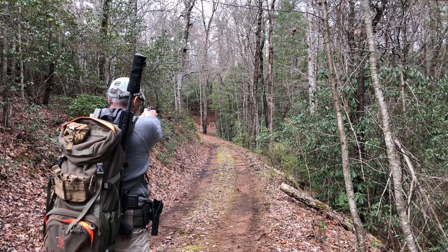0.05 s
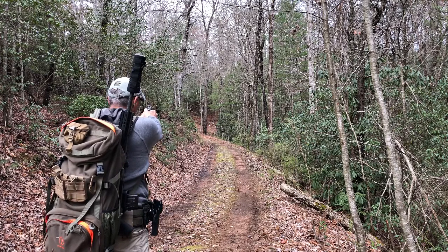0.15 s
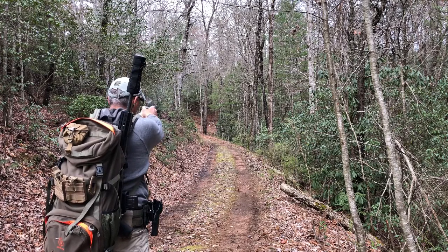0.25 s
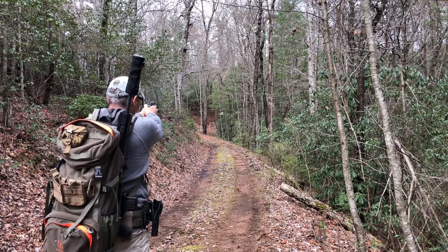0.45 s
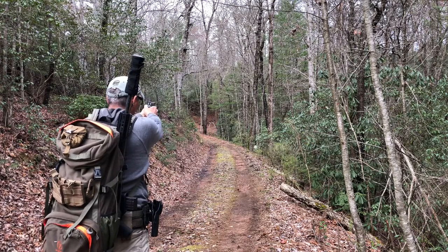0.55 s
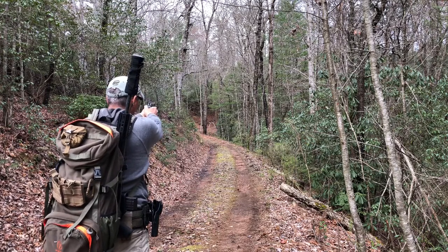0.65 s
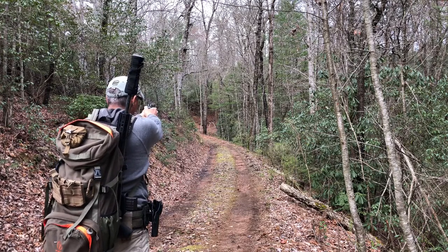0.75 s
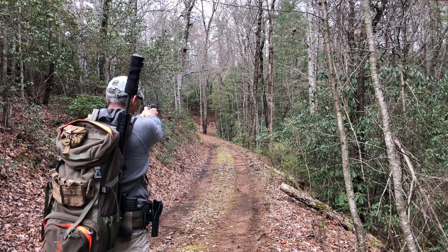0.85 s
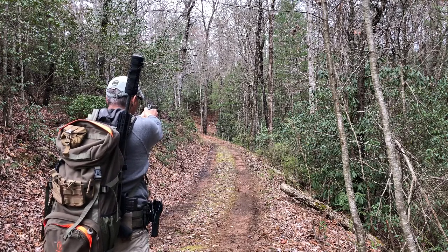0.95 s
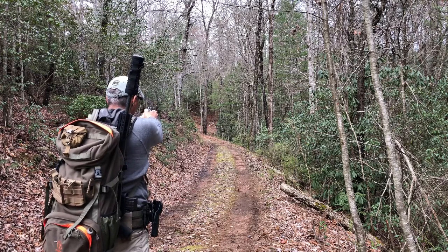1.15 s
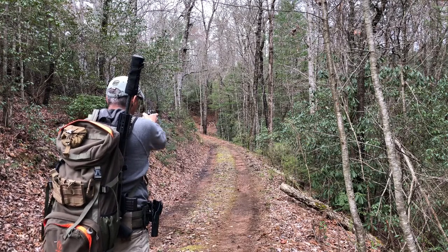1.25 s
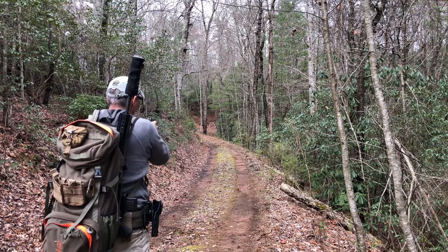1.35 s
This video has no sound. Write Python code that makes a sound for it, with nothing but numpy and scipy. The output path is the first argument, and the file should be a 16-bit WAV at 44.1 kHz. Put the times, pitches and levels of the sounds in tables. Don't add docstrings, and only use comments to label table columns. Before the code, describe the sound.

A single pistol shot on a wooded track, heard a step away through a limiting camera microphone: hard crack, ground slap, rough fluttering tree echoes with low rumble, then a high metallic tinkle of the empty case.

```python
import sys
import numpy as np
from scipy import signal
from scipy.fft import rfft, irfft
from scipy.io import wavfile
from scipy.ndimage import uniform_filter1d

SR = 44100
rng = np.random.default_rng(int(sys.argv[2]) if len(sys.argv) > 2 else 0)


def rack_gain(trim_db):
    fader = np.asarray(trim_db, float)
    return 10 ** (fader / 20)


def output_pcm(signal):
    pcm = np.clip(np.atleast_2d(signal).T, -1, 1) * 32767
    wavfile.write(sys.argv[1], SR, np.round(pcm).astype(np.int16))


N = 61739
T = np.arange(N) / SR
SHOT_S, LEAD_S = .2520, .2297


def evened(x):
    return x / np.sqrt(np.mean(x ** 2) + 1e-20)


def read(points, hz):
    f, value = np.transpose(points)
    return np.interp(np.log(hz + 1), np.log(f + 1), value)


def colour(x, points):
    gain = rack_gain(read(points, np.fft.rfftfreq(len(x), 1 / SR)))
    return evened(irfft(rfft(x) * gain, len(x)))


def resonate(x, hz, width, times=1):
    turn = np.exp(2j * np.pi * hz * np.arange(len(x)) / SR)
    r = np.exp(-np.pi * width / SR)
    for _ in range(times):
        x = 2 * (turn * signal.lfilter([1 - r], [1, -r], x / turn)).real
    return x


def dying(start, t60):
    t = T - start
    return (t >= 0) * rack_gain(-60 * np.maximum(t, 0) / t60)


def rise(start, seconds):
    return np.clip((T - start) / seconds, 0, 1)


def wander(width):
    smooth = uniform_filter1d(rng.standard_normal(N), size=width)
    return evened(uniform_filter1d(smooth, size=width))


# (frequency [Hz], level [dB])
SWELL_PARTIALS = [(218, -8), (464, -0.5), (738, -5.5), (997, -10), (1290, -28), (121, -15), (624, -10.5),
                  (910, -13), (1717, -17), (1980, -13.5)]


def low_swell():
    top_s, t60, level_db, rise_db_per_s = .2516, .009, -4, 1502.5
    bounce_delay_s, bounce_db, bounce_wide_s = .0078, -13.5, .0022
    heave_hz, heave_db, heave_s, heave_wide_s = 38, -33, .257, .014

    def crest(t):
        return sum(rack_gain(db) * np.cos(2 * np.pi * hz * t) for hz, db in SWELL_PARTIALS)

    since = T - top_s
    roughness = evened(resonate(rng.standard_normal(N), 700, 1400, 2))
    boom = crest(since) + rack_gain(-11) * roughness
    climb_db = rise_db_per_s * np.maximum(-since, 0)
    fall_db = 60 * (np.maximum(since, 0) / t60) ** 2
    boom = boom * rack_gain(level_db - climb_db - fall_db) * (T >= LEAD_S)
    late = since - bounce_delay_s
    bounce = rack_gain(bounce_db) * np.exp(-(late / bounce_wide_s) ** 2) * crest(late)
    heave = np.cos(2 * np.pi * heave_hz * (T - heave_s))
    heave = heave * rack_gain(heave_db) * np.exp(-((T - heave_s) / heave_wide_s) ** 2)
    return boom + bounce + heave


def lead_in():
    level_db, fade_db_per_s, pulse_hz, pulse_db = -30, 450, 270, 5
    t = T - LEAD_S
    level_db = level_db - fade_db_per_s * t + pulse_db * np.sin(2 * np.pi * pulse_hz * t)
    return rng.standard_normal(N) * rack_gain(level_db) * (T >= LEAD_S) * (T < SHOT_S)


# (frequency [Hz], level [dB per Hz])
CRACK_COLOUR = [(30, -32.5), (1500, -24.5), (3000, -6.5), (5300, 5), (8000, -6), (10500, -1), (14000, -13),
                (16500, -17.5)]


def crack():
    noise = colour(rng.standard_normal(N), CRACK_COLOUR)
    return noise * rack_gain(-3) * dying(SHOT_S, .024) * rise(SHOT_S, .0012)


# (frequency [Hz], level [dB per Hz])
SLAP_COLOUR = [(30, -29.5), (280, -24), (500, -6), (750, -3), (1700, -17.5), (4500, -10), (10000, -18),
               (16500, -35.5)]


def ground_slap():
    noise = colour(rng.standard_normal(N), SLAP_COLOUR)
    return noise * rack_gain(-17) * dying(SHOT_S, .07) * rise(SHOT_S, .003) ** 2


def low_push():
    push_hz, rumble_hz = 55.5, 190
    push = rack_gain(-14) * dying(LEAD_S, .09) * np.sin(2 * np.pi * push_hz * (T - LEAD_S))
    rumble = evened(resonate(rng.standard_normal(N), rumble_hz, rumble_hz, 2))
    swell = np.clip(0.36 + (T - SHOT_S) / .35, 0, 1)
    rumble = rumble * rack_gain(-39) * dying(SHOT_S, 1.49) * swell
    return (push + rumble) * rise(LEAD_S, .013) ** 2


# (time [s], level [dB])
ECHO_LEVEL = [(0.262, -17.5), (0.274, -23.5), (0.284, -24), (0.366, -24.5), (0.388, -23), (0.398, -21),
              (0.502, -28), (0.552, -34), (0.58, -32), (0.59, -34), (0.726, -36.5), (0.732, -29.5),
              (0.758, -37), (0.774, -31), (0.79, -37), (1.39, -47.5), (1.4, -44.5)]
# (frequency [Hz], level [dB per Hz])
ECHO_COLOUR = [(30, -41.5), (240, -6), (350, -5), (800, 0.5), (1250, -5.5), (1700, -11.5), (8000, -13),
               (16000, -18.5)]
# (frequency [Hz], loss [dB per s])
AIR_LOSS = [(30, 23), (150, -8), (700, 6), (2000, 9), (5000, 24), (9000, 49), (16000, 105.5)]
# (time [s], level [dB])
BIG_TRUNKS = [(0.2565, -5.5), (.2700, 3.5), (.320, 3), (.334, 1), (.346, 3), (0.361, 4.5), (0.377, 3),
              (0.401, 8.5), (0.416, -4), (0.425, 8), (0.453, 4), (0.486, 2), (.510, 4), (0.526, 8),
              (0.561, 2.5), (0.5774, 10.5), (0.616, 4)]
# (time [s], depth [dB], hold [s])
CLAMPS = [
    (.3797, 8, .0088),
    (.4040, 7, .007),
    (.513, 4, .005),
    (.287, 5, .004),
    (.308, 5, .005),
    (.368, 4, .004),
    (.3935, 6, .0095),
    (.2615, 3, .009),
    (.422, 2, .007),
]


def forest():
    trunks_per_s, spread_db, loss_from_s, trunk_wide_s = 12000, 3.5, 0.24, .003
    present = rng.random(N) < trunks_per_s / SR
    size = np.minimum(rng.exponential(1, N), 4)
    pulses = rng.choice([-1., 1.], N) * present * rack_gain(spread_db * size)
    hz, frame_s, z = signal.stft(evened(pulses), SR, nperseg=256, noverlap=192)

    patches = uniform_filter1d(rng.standard_normal(z.shape), size=6, axis=0)
    patches = evened(uniform_filter1d(patches, size=8, axis=1))
    loss_db = read(AIR_LOSS, hz)[:, None] * np.maximum(frame_s - loss_from_s, 0)
    shape = rack_gain(read(ECHO_COLOUR, hz)[:, None])
    body = (hz > 300) & (hz < 1500)
    shape = shape / np.sqrt(np.sum(shape[body] ** 2) / len(hz))
    z = z * shape * rack_gain(1.5 * patches - loss_db)
    echo = signal.istft(z, SR, nperseg=256, noverlap=192)[1][:N]

    level_db = np.interp(T, *np.transpose(ECHO_LEVEL)) + .9 * wander(200)
    for at, db in BIG_TRUNKS:
        level_db = level_db + db * np.exp(-((T - at) / trunk_wide_s) ** 2)
    for at, db, hold in CLAMPS:
        level_db = level_db - db * (T > at) / (1 + (np.abs(T - at) / hold) ** 6)
    echo = echo * rack_gain(level_db) * rise(SHOT_S, .003)
    return signal.sosfilt(signal.butter(8, 295, "high", fs=SR, output="sos"), echo)


# (frequency [Hz], level [dB], t60 [s], faces the microphone at [s], between facings [s])
CASE_MODES = [(5200, -23, 0.4, 0.82, 0.22), (5685, -31, 0.45, 0.83, 0.2), (6417, -40, 0.55, 0.79, 0.13),
              (7122, -24.5, 0.34, 0.80, 0.3), (8129, -46, 0.45, 0.795, .12),
              (8750, -36.5, 0.63, 0.777, 0.17), (9631, -55, 0.45, 0.76, 0.075),
              (10061, -34, .5, .762, 0.155), (11170, -53, 0.55, 0.765, 0.19),
              (11325, -54, 0.55, 0.77, 0.18), (12215, -52, 0.33, .765, .1), (13108, -56, 0.3, .775, .075),
              (13840, -45, 0.3, 0.765, 0.07), (15246, -48, .22, 0.77, .07),
              (2455, -48, 1.58, 0.804, 0.25), (2728, -41.5, 0.63, 0.798, 0.18),
                 (3015, -39.5, 0.56, 0.83, 0.19), (3413, -49, 1.03, 1, 0.09), (4195, -55, 1.4, 0.79, 0.12),
                 (4460, -40, 0.48, 0.855, 0.23), (5010, -55, 1.2, 0.71, 0.17), (14600, -62, .3, .77, .1),
                 (8500, -52, 0.67, 0.76, 0.11), (6360, -47, 1, 0.75, 0.15), (6745, -60, 0.54, 0.72, .1),
                 (12520, -57, 0.34, .78, .09), (13300, -58, .25, .77, .08), (14200, -58, .25, .77, .09),
                 (7540, -51, .4, .79, .1), (4840, -56, .5, .8, .11), (10395, -57, 0.44, .78, .1),
                 (10885, -61, .4, .79, .12), (8960, -48, 0.41, .78, .09), (11800, -62, .4, .78, .11),
                 (15700, -62, .25, .77, .06)]
BEAM_NARROW = [1.5, 3]
NARROW_HZ = [8950, 10061]


def brass_case():
    strike_s, land_s, landed_db = .7283, .998, -17
    beam_sharpness, beam_floor_db, wobble_db = 0.51, -19, 1.6
    shadow_db, emerge_s, emerge_lag_s, emerge_rise_s = -31, 0.7425, 0.019, 0.0095
    twin_hz, twin_db = 21.96, -11
    landed = rise(land_s, .003)
    out = np.zeros(N)
    for hz, db, t60, faces, turn in CASE_MODES:
        p, q = rng.uniform(0, 2 * np.pi, 2)
        narrow = [s for s, f in zip(BEAM_NARROW, NARROW_HZ) if abs(hz / f - 1) < .01]
        sharp = max([beam_sharpness] + narrow)
        beam = rack_gain(beam_floor_db) + np.abs(np.cos(np.pi * (T - faces) / turn)) ** (2 * sharp)
        clear_s = emerge_s + emerge_lag_s * np.log2(10000 / hz)
        hidden = .5 - .5 * np.tanh((T - clear_s) / emerge_rise_s)
        level_db = db + shadow_db * hidden * (hz > 4000) + wobble_db * wander(700)
        level_db = level_db + landed_db * hz / 10000 * landed
        ring = np.sin(2 * np.pi * hz * T + p)
        ring = ring + rack_gain(twin_db) * np.sin(2 * np.pi * (hz + twin_hz) * T + q)
        out += rack_gain(level_db) * dying(strike_s, t60) * beam * ring
    trees = rng.standard_normal(N) * dying(0.0074, .95)
    trees = resonate(resonate(trees, 3000, 7400), 3300, 5900)
    return out + rack_gain(-27) * signal.fftconvolve(out, trees / np.linalg.norm(trees))[:N]


# (time [s], level [dB], centre [Hz], t60 [s], width [share of centre])
TICKS = [(0.329, -31.5, 400, 0.11, 0.43), (.358, -22.5, 408, 0.051, 0.25), (.388, -21.5, 392, 0.069, 0.25),
         (0.7289, -27, 6000, 0.0014, 0.86), (0.7149, -43, 5430, 0.0027, 0.56),
         (0.728, -19, 5430, 0.0056, 0.93), (0.7275, -41, 5000, 0.22, 1.0), (0.7319, -25.5, 830, 0.0033, 2),
         (.745, -59.5, 13000, 0.12, .6), (.9975, -59.5, 13960, 0.14, 1.06), (1.003, -63, 8960, 0.11, 0.49),
         (1.051, -93.5, 13900, .008, .4), (1.119, -75.5, 9930, 0.0066, 0.33),
         (1.2193, -41, 11140, 0.0036, 0.74), (1.220, -77, 11090, 0.11, 1), (1.03, -73, 4195, 1.1, 0.0054),
         (1.04, -77.5, 5211, 0.4, .004), (1.04, -74, 5010, 0.94, 0.0033), (1.03, -73.5, 5600, 1.14, 0.0063),
         (1.085, -72, 7094, 0.45, 0.0033), (1.101, -77, 6440, 0.47, 0.0038),
         (1.284, -70, 14500, 0.0085, 0.27), (1.316, -78.5, 8110, 0.0087, 0.31),
         (1.398, -73, 11880, .01, 0.89)]


def ticks():
    noise = rng.standard_normal(N)
    puffs = np.zeros(N)
    for at, db, hz, t60, share in TICKS:
        puff = evened(resonate(noise, hz, share * hz, 3))
        puffs += rack_gain(db) * dying(at, t60) * rise(at, .0004) ** 2 * puff
    whine = rack_gain(-93) * rise(1.25, .04) * np.sin(2 * np.pi * 9448 * T)
    return signal.sosfilt(signal.butter(4, 300, "high", fs=SR, output="sos"), puffs + whine)


# (frequency [Hz], level [dB per Hz])
HUSH_COLOUR = [(30, -39.5), (60, -17), (195, -9), (359, -20.5), (900, -23), (2220, -37), (11400, -42),
               (15200, -49), (16500, -37)]


def hush():
    level_db, duck_db, back_db_per_s = -62.5, -13, 5
    duck = (T > SHOT_S) * (duck_db + back_db_per_s * (T - SHOT_S))
    return colour(rng.standard_normal(N), HUSH_COLOUR) * rack_gain(level_db + duck)


def scene():
    shot = low_swell() + lead_in() + crack() + ground_slap() + low_push()
    return (shot + forest() + brass_case() + ticks() + hush())[None]


def band_limit(x):
    return signal.sosfilt(signal.butter(12, 16620, fs=SR, output="sos"), x)


def record(dry):
    ceiling = 1.08
    lowpass = signal.firwin(511, 15900, window=("kaiser", 9), fs=SR)
    dull = signal.oaconvolve(dry, lowpass[None], "same")
    mix = ceiling * np.tanh(dull / ceiling)
    return band_limit(mix)


dry = scene()
out = record(dry)
output_pcm(out)
```